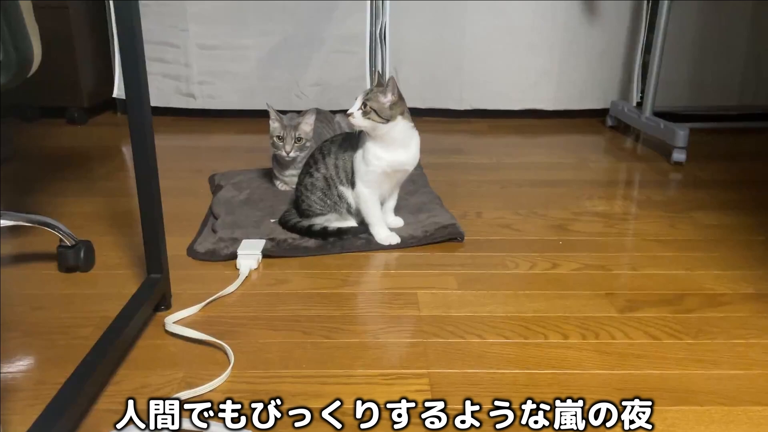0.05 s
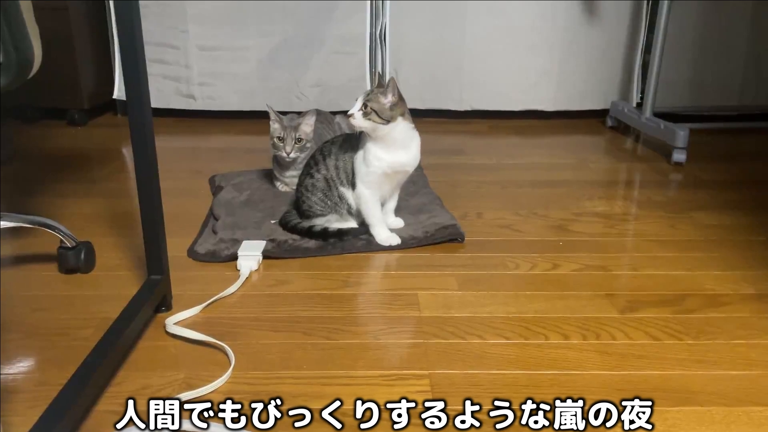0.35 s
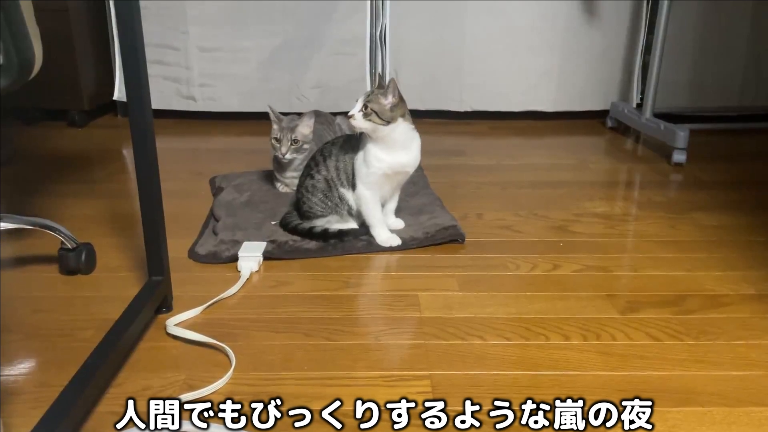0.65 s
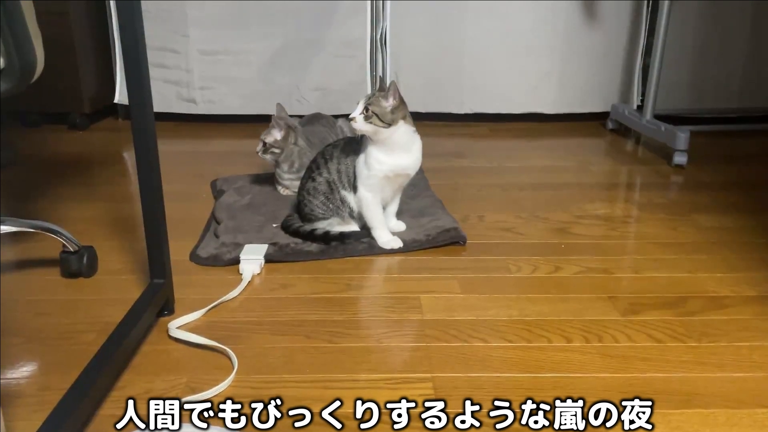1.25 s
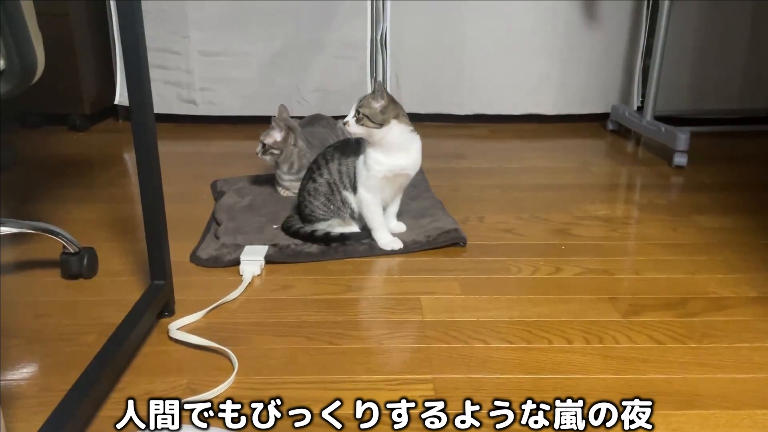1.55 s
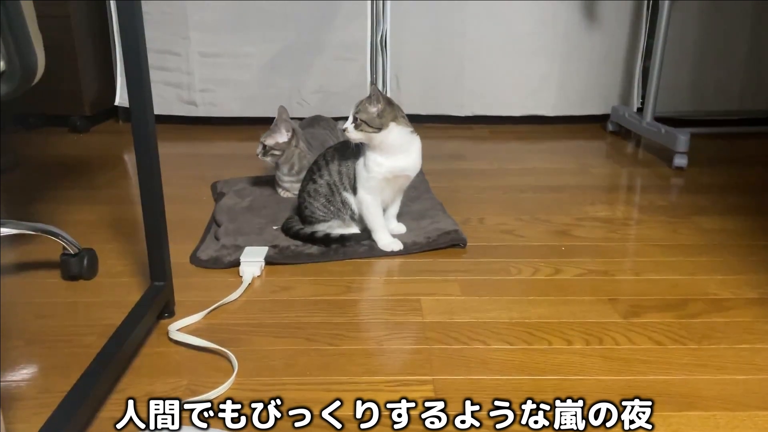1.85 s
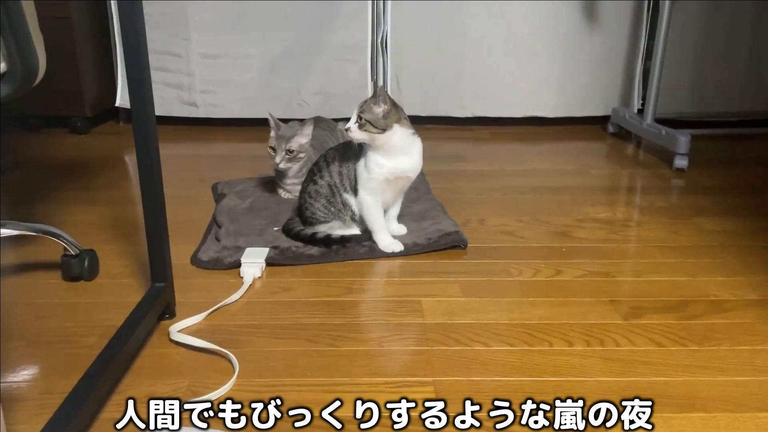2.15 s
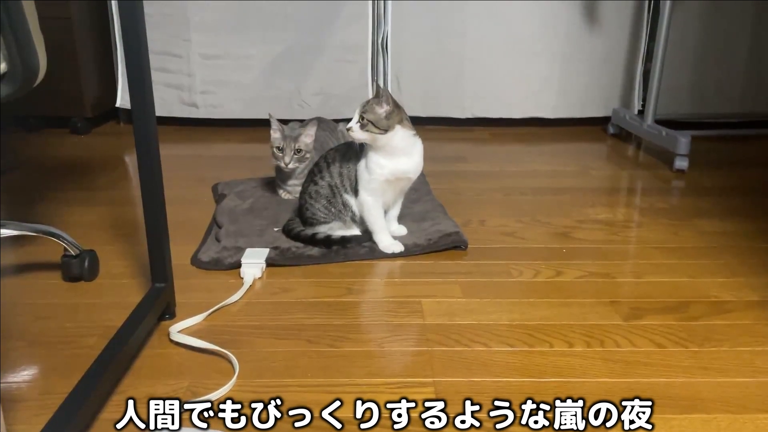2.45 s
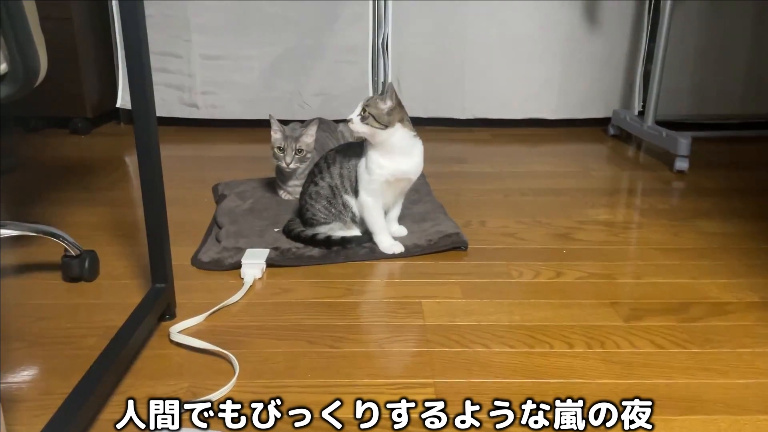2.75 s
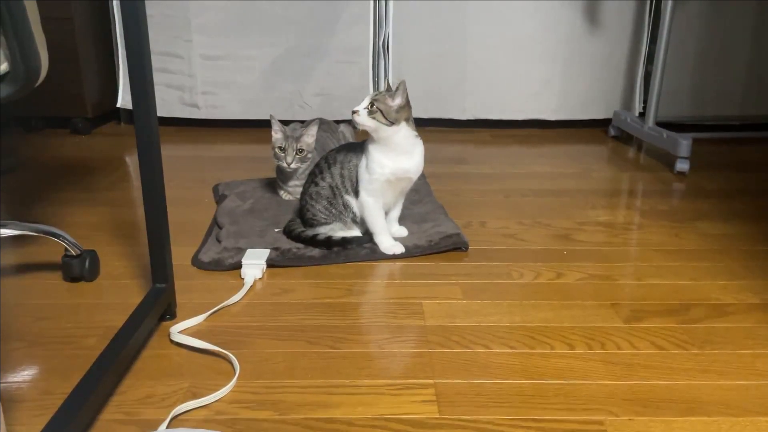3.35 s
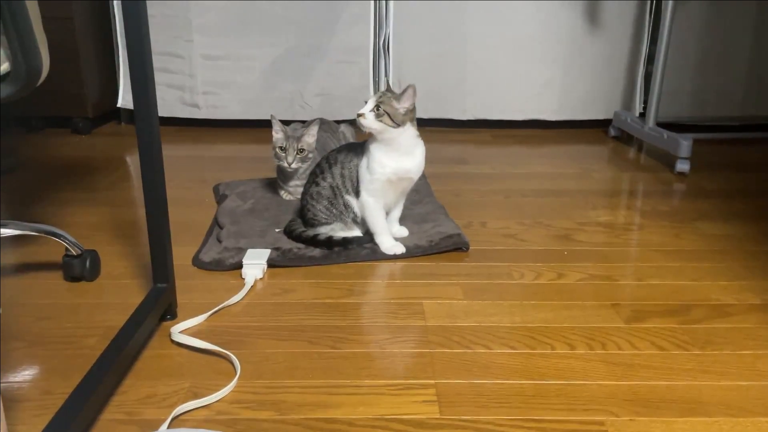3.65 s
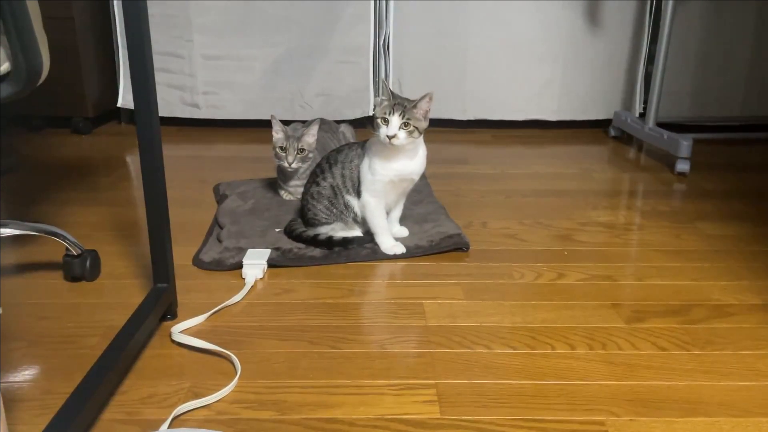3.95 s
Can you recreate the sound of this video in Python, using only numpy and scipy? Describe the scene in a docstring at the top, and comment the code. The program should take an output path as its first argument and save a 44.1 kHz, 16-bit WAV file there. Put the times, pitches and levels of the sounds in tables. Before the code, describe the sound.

Distant thunder rumbles throughout, deep and muffled, heard inside a closed room. Softer rain washes over the house and patters on the window in gusts. A faint, dull bump comes at 0.5 seconds. The thunder swells near 1.2 seconds and again around 2 seconds, making the room boom, then rolls on more quietly. At about 3.6 seconds a brief, brighter spray of rain hits the glass.

```python
"""A stormy night heard from a closed room. From the start rain washes over the house, gusts throw
sheets of it at the window and distant thunder rolls through the walls. At 0.5 s something bumps
faintly. The thunder swells near 1.2 s and again near 2 s and makes the room boom, then rumbles on.
At 3.6 s one brighter spray hits the pane."""
import sys
import numpy as np
from scipy import signal
from scipy.io import wavfile
from scipy.ndimage import uniform_filter1d

SR = 44100
rng = np.random.default_rng(int(sys.argv[2]) if len(sys.argv) > 2 else 0)


def store_pcm(level_fs):
    """Save levels as 16-bit WAV."""
    pcm = np.round(np.clip(level_fs, -1, 1) * 32767).astype(np.int16)
    wavfile.write(sys.argv[1], SR, np.atleast_2d(pcm).T)


N = 176400
T = np.arange(N) / SR

STEREO_CORRELATION = [(60, 0.98), (100, 0.91), (170, 0.81), (300, 0.81), (550, 0.18), (1300, 0.46),
                      (1900, 0.18), (3300, 0.075), (4400, 0.24), (5400, .3), (6200, 0.083), (11000, 0.1)]  # f/Hz, left-right correlation
STEREO_BALANCE = [(60, -2.7), (150, -1.5), (330, 0.5), (700, 2.5), (1400, -2), (2800, -2.3), (6000, -1.5),
                  (12000, 0.5)]  # f/Hz, left minus right/dB

BUMP_HITS = [(0.517, -45)]  # t/s, level/dB
BUMP_MODES = [(334, -16, 0.12), (391, -10.5, 0.25), (527, 4, 0.0076), (720, -4, 0.0092),
              (1000, -18, 0.0074)]  # f/Hz, level/dB, t60/s

# Rain. Levels are relative; spectra give noise density.
WASH_ENVELOPE = [(0, -58.5), (.32, -63.5), (.45, -61.5), (.72, -61.5), (1.0, -61.5), (1.45, -61),
                 (2.0, -61.5), (2.4, -61.5), (2.9, -61), (3.3, -61), (3.5, -62), (3.72, -61), (3.85, -62.5),
                 (4.0, -58.5)]  # t/s, level/dB
WASH_SPECTRUM = [(200, 2.5), (500, 4.5), (750, 0.5), (1000, 5), (1500, -2), (2100, -4), (2800, -9),
                 (3600, -15), (4600, -22.5), (5800, -23.5), (7000, -35), (8200, -42.5), (9500, -26.5),
                 (11400, -32), (14000, -49.5), (16000, -46)]  # f/Hz, level/dB
SHEET_HITS = [(.02, -70, .04), (.1, -63.5, .06), (.25, -71, .06), (.445, -64.5, .05), (.57, -74, .08),
              (1.01, -65.5, .07), (1.16, -72, .06), (1.33, -66, .05), (1.44, -73, .05), (1.66, -69, .09),
              (2.13, -71, .04), (2.44, -68, .04), (2.53, -67.5, .05), (2.81, -70, .04), (2.92, -68, .06),
              (3.0, -67, .07), (3.19, -66.5, .08), (3.31, -71, .12), (3.61, -63, .09), (3.73, -67, .05),
              (3.905, -66.5, .04), (3.965, -65, .1)]  # t/s, level/dB, decay/s
SHEET_SPECTRUM = [(500, -6.5), (1100, 1), (2000, 7.5), (2900, -2), (3700, -17), (5000, -20.5)]  # f/Hz, level/dB
HISS_ENVELOPE = [(0, -80), (.28, -76.5), (.36, -82), (.45, -77.5), (.57, -80.5), (.68, -80), (.8, -81),
                 (.98, -75.5), (1.08, -83), (1.38, -77), (1.54, -81.5), (1.68, -77), (1.79, -83),
                 (2.0, -76), (2.09, -82), (2.28, -76.5), (2.36, -90), (2.44, -75.5), (2.74, -80),
                 (2.95, -75.5), (3.4, -76.5), (3.53, -78.5), (3.76, -76.5), (3.84, -83), (4.0, -73)]  # t/s, level/dB
HISS_SPECTRUM = [(3100, -9), (3700, -2), (4600, 2.5), (5400, -10.5), (6400, -21)]  # f/Hz, level/dB
SPRAY_SPECTRUM = [(1500, 7), (3000, 12), (4800, 13), (7000, 3.5), (9000, -6), (12000, -23), (16000, -36)]  # f/Hz, level/dB
SPLASH_HITS = [(.095, -68.5, 3930, 1570, .055), (.16, -83, 6300, 500, 0.022),
               (0.239, -75, 5040, 1000, 0.036), (.27, -71.5, 2670, 150, .12),
               (.845, -68.5, 2900, 700, .045), (.93, -72.5, 4900, 1800, 0.043),
               (1.15, -75, 3700, 1400, .04), (1.33, -77, 5500, 1305, 0.033), (1.335, -73, 2970, 700, 0.061),
               (1.42, -73, 3670, 600, 0.058), (1.445, -77.5, 5440, 500, .035),
               (1.614, -75.5, 5400, 1800, .05), (1.635, -72, 3550, 600, 0.058),
               (1.88, -75.5, 5000, 1300, .07), (2.19, -72, 4640, 1170, .07), (2.49, -80, 4660, 1700, 0.052),
               (2.89, -79, 5130, 1200, 0.037), (2.97, -71, 4700, 1400, .045),
               (2.985, -64, 3370, 400, 0.049), (3.11, -73, 3650, 700, 0.059),
               (3.205, -78, 5600, 1500, 0.037), (3.34, -75, 4750, 900, 0.072),
               (3.47, -88, 6160, 600, 0.023), (3.715, -74, 5260, 2400, .04),
               (3.895, -68, 4500, 1980, 0.031), (3.945, -70, 4760, 1000, .08)]  # t/s, level/dB, f/Hz, width/Hz, decay/s
PANE_MODES = [(756, 67, -6.5), (901, 16, -11), (1500, 42, -21), (2000, 100, -14), (2760, 290, -6),
              (3060, 84, -18), (3560, 190, -12), (7400, 180, 1)]  # f/Hz, width/Hz, level/dB

# Thunder. Same conventions.
ROLL_ENVELOPE = [(0, -46.5), (.25, -51.5), (.45, -47), (.85, -45), (1.0, -42.5), (1.09, -38.5),
                 (1.24, -36.5), (1.42, -46.5), (1.56, -43.5), (1.82, -40.5), (1.95, -37.5), (2.25, -38.5),
                 (2.46, -42), (2.69, -41), (2.85, -46.5), (3.1, -40.5), (3.3, -47.5), (3.6, -46),
                 (4.0, -44.5)]  # t/s, level/dB
ROLL_SPECTRUM = [(22, -25.5), (28, -13.5), (36, -2.5), (46, 1), (57, -1), (72, 1), (90, -1), (114, -4.5),
                 (145, -10), (180, -14), (230, -22.5), (400, -39.5)]  # f/Hz, level/dB
GROWL_ENVELOPE = [(0, -52), (.38, -56), (.52, -48.5), (.74, -53), (1.0, -48.5), (1.08, -42.5), (1.2, -41),
                  (1.28, -45), (1.35, -47), (1.6, -48.5), (1.83, -50.5), (1.9, -43.5), (2.06, -48),
                  (2.23, -44.5), (2.38, -50), (2.55, -50), (2.72, -47.5), (2.99, -51), (3.14, -47.5),
                  (3.35, -53), (4.0, -53.5)]  # t/s, level/dB
GROWL_SPECTRUM = [(70, -9.5), (120, -13), (175, -0.5), (225, -6), (310, -4), (420, -9.5), (520, -18),
                  (700, -19), (1100, -45), (2000, -58.5)]  # f/Hz, level/dB
BOOM_HITS = [(0.081, -37, 129), (.525, -31, 82), (1.061, -26, 53.3), (1.081, -31.5, 125.5),
             (1.196, -25, 76.7), (1.312, -25.5, 65.4), (1.508, -31, 103), (1.895, -36, 149),
             (1.916, -23.5, 62), (1.972, -42, 54.7), (2.165, -25.5, 69.7), (2.21, -34.5, 175),
             (2.343, -28.5, 125), (2.481, -36, 75.4), (2.544, -31.5, 165), (2.637, -30.5, 90),
             (3.05, -34, 138.5), (3.125, -37, 170), (3.409, -32.5, 69), (3.494, -38, 125.5),
             (3.565, -44, 359.6), (3.69, -34, 83), (3.847, -38.5, 170.5), (3.951, -27.5, 54.5)]  # t/s, level/dB, f/Hz
ROOM_MODES = [(41.7, 26, -12), (69.5, 1.8, 0), (115, 15, -14.5), (175, 15.8, -5), (296.4, 2.3, -15)]  # f/Hz, width/Hz, level/dB


def from_db(db):
    """Decibels to gain."""
    return 10 ** (np.asarray(db) / 20)


def unit_rms(x):
    """Scale to rms 1."""
    return x / np.sqrt(np.mean(x ** 2) + 1e-20)


def envelope(points):
    """Gain over time from (t/s, level/dB) points."""
    return from_db(np.interp(T, *np.transpose(points)))


def swell(peak_s, attack_s, decay_s):
    """Linear rise, exponential fall."""
    return np.clip(1 + (T - peak_s) / attack_s, 0, 1) * np.exp(-np.maximum(T - peak_s, 0) / decay_s)


def at_hz(points, hz):
    """Table lookup over log frequency."""
    points_hz, values = np.transpose(points)
    return np.interp(np.log(hz), np.log(points_hz), values)


def pan(hz):
    """Left and right gains at one frequency."""
    return from_db(at_hz(STEREO_BALANCE, hz) * np.array([[.5], [-.5]]))


def drift(rate_hz):
    """Slow random wander, rms 1."""
    hop, warmup = 40, 2000
    r = np.exp(-2 * np.pi * rate_hz * hop / SR)
    slow = signal.lfilter([1], [1, -2 * r, r * r], rng.standard_normal(N // hop + warmup + 2))[warmup:]
    return np.interp(np.arange(N) / hop, np.arange(len(slow)), unit_rms(slow))


def banded_noise(spectrum, flicker_db, flicker_hz):
    """Diffuse stereo noise in independently flickering third octaves, rms 1."""
    edges_hz = 20 * 2 ** (np.arange(30) / 3)
    out, white = 0, rng.standard_normal((2, 2, N))
    for k, (low, high) in enumerate(zip(edges_hz, edges_hz[1:])):
        hz, flicker = np.sqrt(low * high), drift(flicker_hz)
        if spectrum[0][0] < high and low < spectrum[-1][0]:
            band = signal.butter(2, [low, high], "band", fs=SR, output="sos")
            mid, side = signal.sosfilt(band, white[k % 2])
            correlation = at_hz(STEREO_CORRELATION, hz)
            stereo = np.sqrt(1 + correlation) * mid + np.sqrt(1 - correlation) * side * [[1], [-1]]
            out += from_db(at_hz(spectrum, hz) + flicker_db * flicker) * pan(hz) * stereo
    return unit_rms(out)


def levelled(x, window_s):
    """Hold the running rms near 1."""
    return x / np.sqrt(uniform_filter1d(np.mean(x ** 2, axis=0), int(window_s * SR)) + 1e-9)


def ring(clicks, hz, t60_s):
    """One damped sine per click."""
    r, w = from_db(-60 / (t60_s * SR)), 2 * np.pi * hz / SR
    return signal.lfilter([0, np.sin(w)], [1, -2 * r * np.cos(w), r * r], clicks + 1e-18)


def resonate(x, modes):
    """Room or pane resonances lift narrow bands."""
    return x + sum(from_db(db) * signal.lfilter(*signal.iirpeak(hz, hz / width_hz, fs=SR), x)
                   for hz, width_hz, db in modes)


def wall_echoes(x, count=6, echo_db=-16, lag_range_s=(.003, .02)):
    """Near-wall reflections ripple the spectrum at constant power."""
    lags = (rng.uniform(*lag_range_s, count) * SR).astype(int)
    echoes = sum((-1) ** k * np.pad(x, ((0, 0), (lag, 0)))[:, :N] for k, lag in enumerate(lags))
    return (x + from_db(echo_db) * echoes) / np.sqrt(1 + count * from_db(echo_db) ** 2)


def bump():
    """Dull knock, as of a window frame moving in the wind."""
    clicks = np.zeros(N)
    for start_s, db in BUMP_HITS:
        clicks[int(start_s * SR)] = from_db(db)
    return sum(from_db(db) * ring(clicks, hz, t60_s) * pan(hz) for hz, db, t60_s in BUMP_MODES)


def drops(rate_per_s=270, spread_db=4, t60_cycles=25):
    """Small drops tick on the pane at random pitches, rms 1."""
    pitches_hz = np.geomspace(1400, 3700, 20)
    sizes = from_db(spread_db * np.minimum(rng.exponential(1, (2, N)), 4))
    signs = rng.choice([-1, 1], (2, N))
    clicks = sizes * signs * (rng.random((2, N)) < rate_per_s / SR)
    pitch_index = rng.integers(0, len(pitches_hz), (2, N))
    return unit_rms(sum(ring(clicks * (pitch_index == k), hz, t60_cycles / hz) * pan(hz)
                        for k, hz in enumerate(pitches_hz)))


def spray():
    """One brighter burst of rain on the pane."""
    mist = banded_noise(SPRAY_SPECTRUM, flicker_db=1.3, flicker_hz=25)
    return from_db(-66.5) * swell(peak_s=3.6, attack_s=.028, decay_s=.075) * mist


def splashes(attack_s=.015, gain_db=-1):
    """Each splash strikes the pane and dies away in its own noise band."""
    out, white = 0, rng.standard_normal((2, N))
    for peak_s, db, hz, width_hz, decay_s in SPLASH_HITS:
        band = signal.butter(2, [hz - width_hz / 2, hz + width_hz / 2], "band", fs=SR, output="sos")
        noise = unit_rms(signal.sosfilt(band, white))
        out += from_db(db + gain_db) * swell(peak_s, attack_s, decay_s) * noise * pan(hz)
    return out


def rain(gust_attack_s=.029):
    """Steady wash and fine hiss; gusts throw sheets and drive the drops harder; the pane rings."""
    steady = envelope(WASH_ENVELOPE)
    gusts = sum(from_db(db) * swell(peak_s, gust_attack_s, decay_s) for peak_s, db, decay_s in SHEET_HITS)
    wash = from_db(.5) * steady * banded_noise(WASH_SPECTRUM, flicker_db=.7, flicker_hz=11)
    sheets = from_db(1.5) * gusts * banded_noise(SHEET_SPECTRUM, flicker_db=2.5, flicker_hz=11)
    hiss = envelope(HISS_ENVELOPE) * banded_noise(HISS_SPECTRUM, flicker_db=3, flicker_hz=38)
    patter = from_db(-74.5) * unit_rms(steady + gusts) * drops()
    return resonate(wash + spray() + wall_echoes(sheets + hiss + splashes() + patter), PANE_MODES)


def booms(attack_cycles=.48, t60_s=.18):
    """Shock fronts, rounded by distance, shake the walls for a few cycles."""
    out = 0
    for start_s, db, hz in BOOM_HITS:
        age_s = np.maximum(T - start_s, 0)
        shape = np.minimum(age_s * hz / attack_cycles, 1) * from_db(-60 * age_s / t60_s)
        out += from_db(db) * shape * np.sin(2 * np.pi * hz * age_s) * pan(hz)
    return out


def thunder():
    """Deep roll, a growl above it and single booms, all coloured by the room."""
    roll_noise = banded_noise(ROLL_SPECTRUM, flicker_db=1.5, flicker_hz=10)
    growl_noise = banded_noise(GROWL_SPECTRUM, flicker_db=2, flicker_hz=11.8)
    roll = envelope(ROLL_ENVELOPE) * levelled(resonate(roll_noise, ROOM_MODES), window_s=.11)
    growl = envelope(GROWL_ENVELOPE) * levelled(resonate(growl_noise, ROOM_MODES), window_s=.08)
    return roll + from_db(-3) * growl + from_db(-3.5) * resonate(booms(), ROOM_MODES)


def scene(right_lag_s=.00026):
    """Storm and bump reach the left microphone first."""
    left, right = thunder() + rain() + bump()
    return np.array([left, np.pad(right, (round(right_lag_s * SR), 0))[:N]])


def record(dry, low_cut_hz=25, stopband_hz=16500):
    """The microphone loses the lowest bass; the top is cut."""
    highpass = signal.butter(4, low_cut_hz, "high", fs=SR, output="sos")
    lowpass = signal.cheby2(12, 70, stopband_hz, fs=SR, output="sos")
    return signal.sosfilt(lowpass, signal.sosfilt(highpass, dry))


dry = scene()
out = record(dry)
store_pcm(out)
```